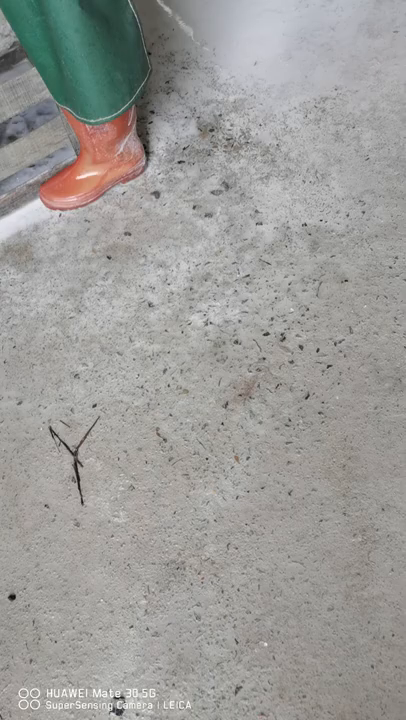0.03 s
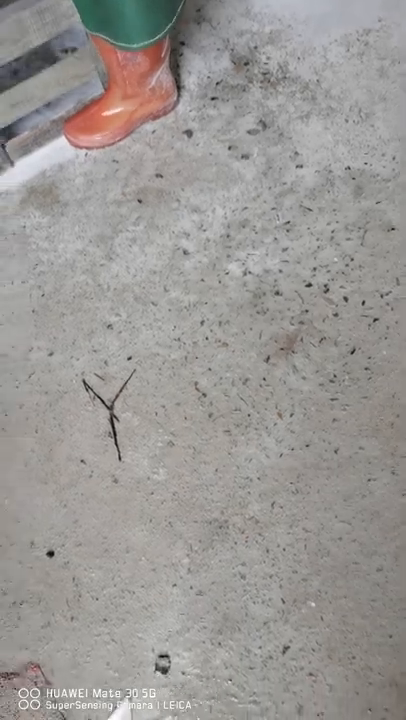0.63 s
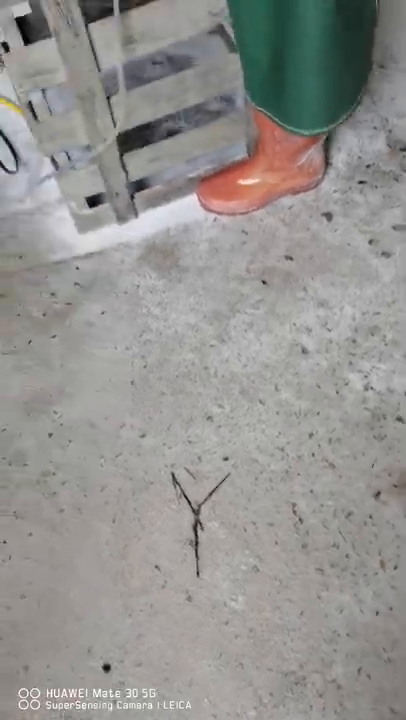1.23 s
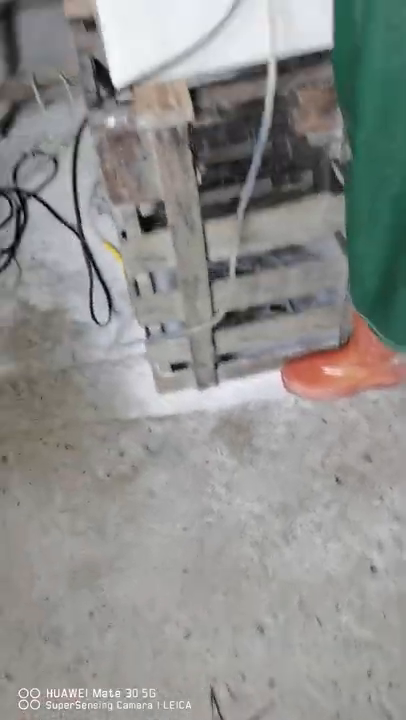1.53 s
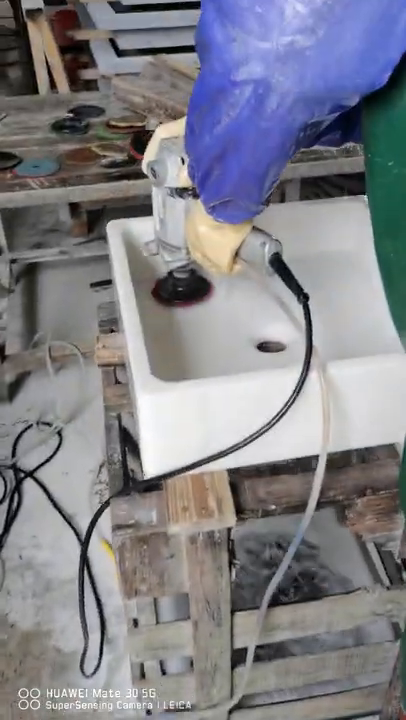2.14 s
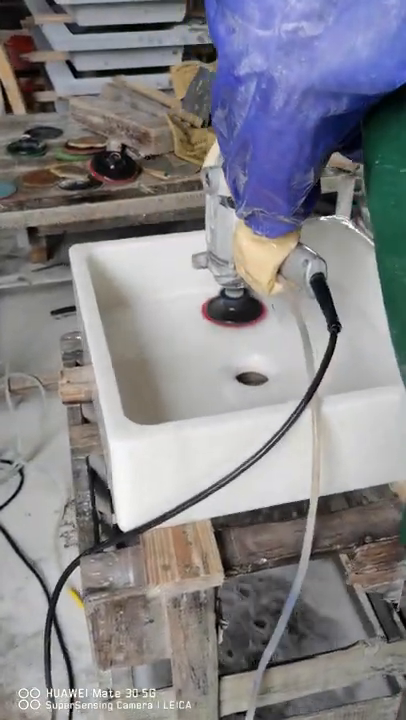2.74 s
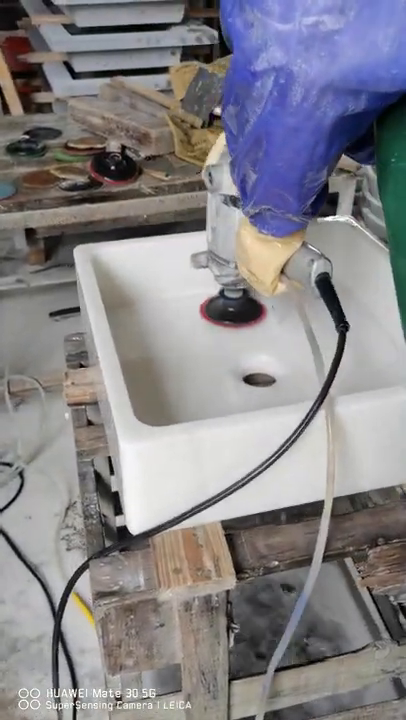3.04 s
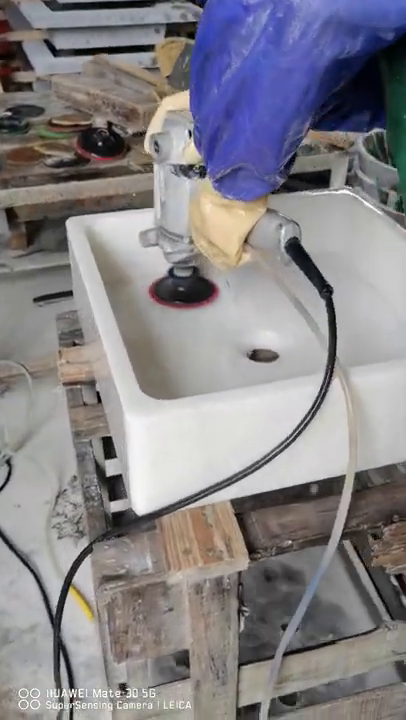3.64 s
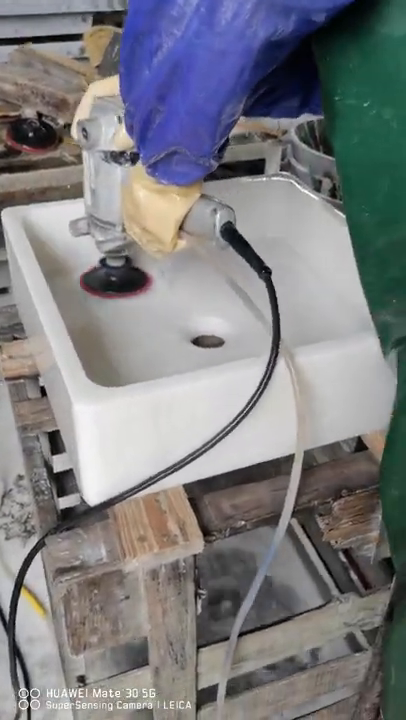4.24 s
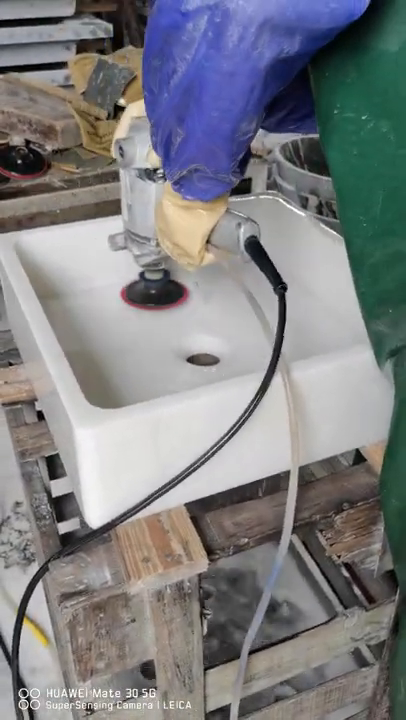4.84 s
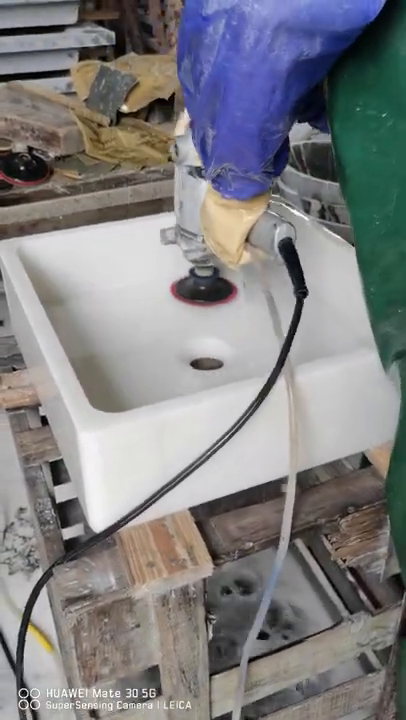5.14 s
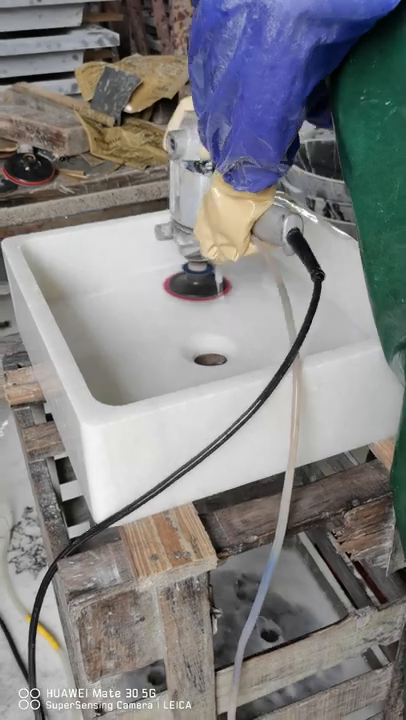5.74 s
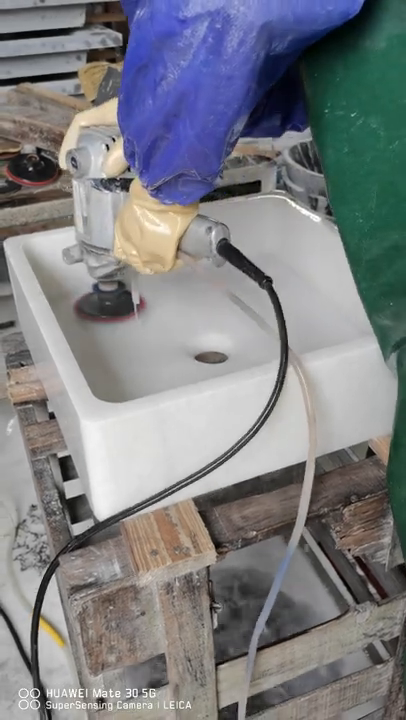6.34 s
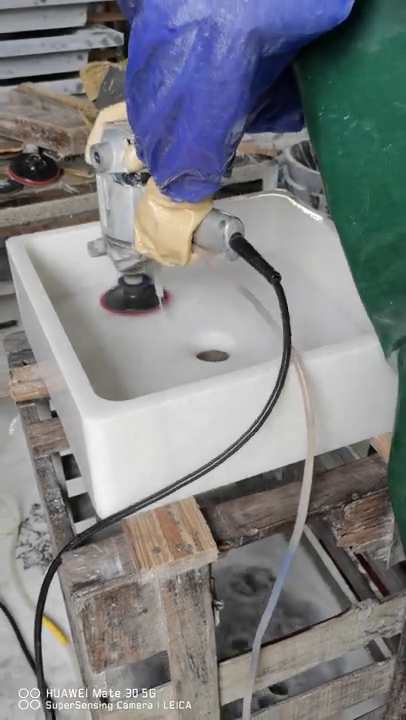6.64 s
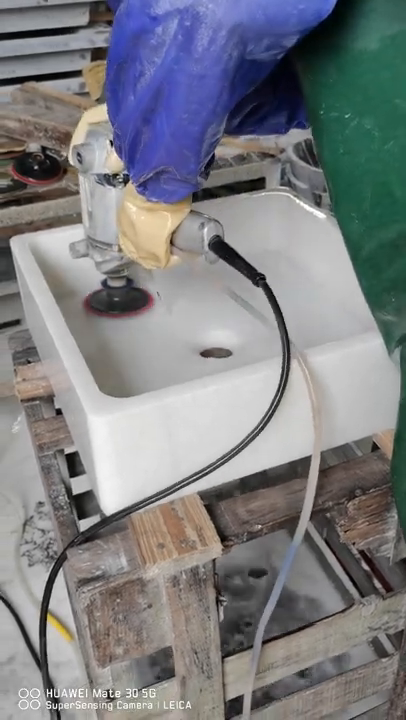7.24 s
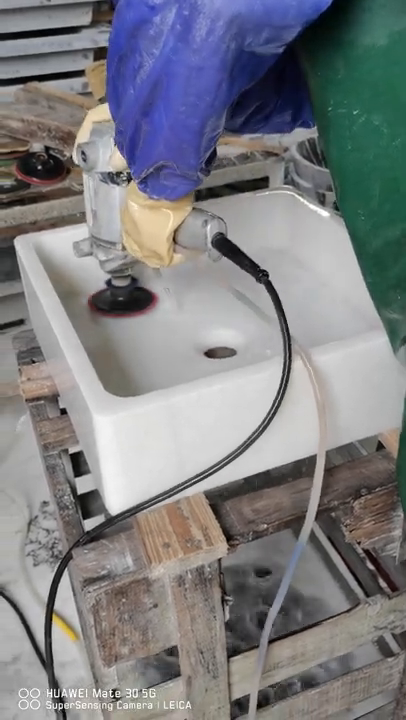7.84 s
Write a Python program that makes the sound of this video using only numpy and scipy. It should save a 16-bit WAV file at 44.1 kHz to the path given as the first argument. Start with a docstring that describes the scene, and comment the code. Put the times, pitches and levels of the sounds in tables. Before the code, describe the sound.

A power polisher runs loudly against a wet stone basin in a workshop, starting suddenly and never pausing. The pad makes a steady roar with gritty grinding and a wavering hiss, which brightens as the microphone turns toward it in the first two seconds. The motor's high whine swells briefly several times and shifts slightly in pitch under load, while the basin rings faintly and other machines hum beneath.

```python
"""Polishing a wet stone basin

In a workshop, a handheld electric polisher works the basin's wet floor while a stereo microphone swings
up from the ground to face it. The spinning pad roars, grinds and hisses on the stone and rings the basin;
the motor whines and sags a little under load. Beneath lies the steady hum of that motor and other
machines. The sound cuts in after a moment of silence."""
import sys
import numpy as np
from scipy import signal
from scipy.fft import rfft, irfft
from scipy.io import wavfile
from scipy.ndimage import uniform_filter1d

SR = 44100
rng = np.random.default_rng(int(sys.argv[2]) if len(sys.argv) > 2 else 0)


def unload_audio(sound):
    """Save the sound as a 16-bit wav file, at the path given as the first command line argument."""
    columns = np.transpose(np.atleast_2d(sound))
    # keep every value between -1 and 1, then stretch to whole-number steps
    steps = np.round(np.clip(columns, -1, 1) * 32767)
    wavfile.write(sys.argv[1], SR, steps.astype(np.int16))


N = 347508
T = np.arange(N) / SR
FRAME_S = np.arange(N // 512 + 5)[:, None] * 512 / SR
BIN_HZ = np.fft.rfftfreq(2048, 1 / SR)


# the pad bites harder into the stone: centre_s, half_length_s, gain_db
PAD_BITES = [(1.58, 0.32, 0.9), (5.9, 1, 0.54)]
def pad(spindle, throb=.035, chatter_db=.52, grit_db=.54):
    """The pad presses harder once a turn and chatters in the hand; grit makes the treble uneven."""
    pressure = gain_of(chatter_db * drift(18.5)) * (1 + throb * np.cos(spindle))
    grit = grit_db * drift(700)
    bite = swells(PAD_BITES)
    return pressure * (wet_hiss(grit) + roar(bite) + grinding(bite + grit))


# colour of the roar, microphone pointing down and facing the basin: frequency_hz, relative_db
ROAR_DOWN = [(15, -54), (25, -19), (103, -12.5), (168, -14), (200, -7), (301, -3), (331, -3), (764, -8),
             (965, -5), (1220, -14.5), (1480, -6.5), (2600, -6), (3380, -23), (5720, -120)]
ROAR_FACING = [(15, -53), (25, -23), (123, -13), (178, -14.5), (204, -4.5), (238, -10.5), (319, -5),
               (403, -8), (560, -4.5), (779, -3.5), (1000, -2.5), (1200, 0.5), (1400, -9), (2180, -5.5),
               (2600, -4.5), (3380, -6), (5720, -120)]
def roar(boost_db):
    """The low band of the pad rubbing on stone."""
    return friction(ROAR_DOWN, ROAR_FACING, patchy_db=.82) * gain_of(aimed(-24.5, -26.5) + boost_db)


# colour of the grinding, microphone down and facing: frequency_hz, relative_db
GRIND_DOWN = [(1290, -27), (2200, -4.5), (2510, -8), (2880, 0), (5000, -4.5), (5490, -8), (6470, -7.5),
              (7220, -7), (8200, -6.5), (10700, -25), (18000, -120)]
GRIND_FACING = [(1290, -25), (2200, -20.5), (2610, -1), (2960, -1.5), (3510, 0), (5730, -5.5), (6400, -4.5),
                (6690, -2), (8200, -4), (10700, -44), (18000, -120)]
def grinding(boost_db):
    """The middle band of the rubbing."""
    return friction(GRIND_DOWN, GRIND_FACING, patchy_db=1.4) * gain_of(aimed(-20.5, -23) + boost_db)


# colour of the hiss, microphone down and facing: frequency_hz, relative_db
HISS_DOWN = [(6000, -42), (7800, -8.5), (9500, 0.5), (12700, -8.5), (16000, -12)]
HISS_FACING = [(6500, -42), (8200, -11.5), (9400, -1), (11200, -5), (14000, -4.5), (16000, -12.5)]
# the hiss slackens between strokes: centre_s, half_length_s, gain_db
HISS_LULLS = [(3.5, 0.17, -0.5), (4.32, 0.082, -2.5), (5.5, 0.28, -2), (6.3, 0.26, -0.7), (7.13, 0.061, -4),
              (7.45, 0.14, -0.5)]
def wet_hiss(boost_db, wet_db=.84):
    """The top band of the rubbing wavers with the water film and opens up as the microphone rises."""
    film_db = swells(HISS_LULLS) + wet_db * drift(3.1)
    level_db = aimed(-21, -18, full_aim=.74) + film_db + boost_db
    return friction(HISS_DOWN, HISS_FACING, patchy_db=1.5) * gain_of(level_db)


# resonances of room, basin and tool housing: pitch_hz, width_hz, gain_db
RESONANCES = [(142, 19, 4), (215, 16, 3), (279, 15, 2), (554, 34, 4.5), (800, 50, 3.5), (985, 41, 1.5),
              (1014, 63, -4.5), (1170, 250, 0.5), (2850, 106, 3.5), (3480, 58, 4)]
# resonances picked up over only part of the microphone's swing: aim, pitch_hz, width_hz, gain_db
SWING_RESONANCES = [(.13, 326, 62, 2), (.13, 840, 57, 0), (.22, 2800, 54, 3), (.4, 143, 18, 11),
                    (.45, 7600, 530, 5), (.5, 6370, 220, 7), (.6, 870, 110, 4)]
# the pad squeals or the basin rings briefly:
# centre_s, half_length_s, pitch_hz, glide_hz_per_s, width_hz, gain_db
SQUEALS_AND_RINGS = [(1.595, .22, 4000, 1900, 480, 10), (2.85, .6, 13100, 400, 900, 4.5),
                     (4.552, 0.26, 3600, 0, 400, 2.5), (5.35, .4, 766, 0, 60, 5),
                     (5.4, .3, 4120, 100, 220, 6)]
def ringing(aim, aim_spread=.16):
    """The dB that resonances, squeals and brief rings add to the rubbing, by frame and frequency."""
    colour = sum(db / (1 + (2 * (BIN_HZ - hz) / width) ** 2) for hz, width, db in RESONANCES)
    for spot, hz, width, db in SWING_RESONANCES:
        colour = colour + db * bump(aim - spot, aim_spread) * bump(BIN_HZ - hz, width)
    for centre, half, hz, glide, width, db in SQUEALS_AND_RINGS:
        age = FRAME_S - centre
        colour = colour + db * bump(age, half) * bump(BIN_HZ - hz - glide * age, width)
    return colour


def friction(down, facing, patchy_db):
    """Steady rubbing noise; the contact patch keeps changing, so narrow bands come and go."""
    aim = aim_at(FRAME_S)
    colour_db = (1 - aim) * spectrum_at(down, BIN_HZ) + aim * spectrum_at(facing, BIN_HZ) + ringing(aim)
    patches = uniform_filter1d(rng.standard_normal(colour_db.shape), size=14, axis=0)
    patches = unit_rms(uniform_filter1d(patches, size=12, axis=1))
    return stereo_noise(gain_of(colour_db + patchy_db * patches), aim)


# the whine flares as the tool is tilted: centre_s, half_length_s, gain_db
WHINE_FLARES = [(1.65, 0.26, 5.5), (3.35, 0.3, 10), (3.75, .1, 14.5), (4.12, 0.088, 10), (4.7, .1, 8),
                (5.3, 0.064, 9), (5.92, .1, 6), (7.05, .08, 9), (7.62, 0.12, 13.5)]
# weaker motor tones: multiple_of_rotor_rate, level_db
ROTOR_TONES = [(1, -58.5), (2, -52), (4, -51), (9, -43), (10, -45), (11, -41), (12, -43.5), (14, -45)]
def motor(rotor, spindle, rotor_hz, whine_order=18, wobble=.55, waver_db=2):
    """Multiples of the rotor rate; the main whine wavers, flares and wobbles once a spindle turn."""
    whine = room_tone(whine_order * rotor, whine_order * rotor_hz, scatter=.53, fade_hz=10)
    whine *= gain_of(aimed(-32, -41) + swells(WHINE_FLARES) + waver_db * drift(4.6))
    whine *= 1 + wobble * np.cos(spindle)
    return whine + sum(gain_of(db) * room_tone(order * rotor, order * rotor_hz, scatter=1, fade_hz=2.8)
                       for order, db in ROTOR_TONES)


# the motor's speed eases up and down with the load: time_s, rotor_hz
ROTOR_SPEED = [(.3, 365.6), (1.3, 372.3), (2.3, 377.2), (2.9, 375), (3.7, 376.7), (4.0, 374.6),
               (4.65, 378.3), (5.25, 375.3), (5.9, 384.4), (6.45, 387.9), (7.0, 381.6), (7.8, 376.6)]
def polisher(gear_ratio=4.82, speed_jitter=.00022):
    """The rotor drives the pad through a reduction gear."""
    rotor_hz = curve(ROTOR_SPEED, T)
    rotor = angle_of(rotor_hz * (1 + speed_jitter * drift(9.4)))
    spindle = rotor / gear_ratio
    return pad(spindle) + motor(rotor, spindle, rotor_hz.mean())


# hum of the polisher's motor and other workshop machines: pitch_hz, mic_down_db, mic_facing_db, fade_hz
HUM_TONES = [(66, -51, -57.5, 3.6), (105.2, -39, -64, 3.6), (210.4, -40, -44.5, 5.6),
             (333, -37, -53.5, 4.8), (369.5, -32.5, -59, 3.5), (1500, -49, -56, 6.8),
             (1672, -38.5, -48, 0.94), (1846, -37, -49, 8.7)]
def steady_hum():
    """Steady motor and machine tones, blurred by the room and stronger with the microphone down."""
    return sum(gain_of(aimed(down, facing)) * room_tone(angle_of(hz), hz, scatter=.31, fade_hz=fade)
               for hz, down, facing, fade in HUM_TONES)


# the microphone's swing: time_s, aim (0 down at the ground, 1 facing the basin)
MIC_SWING = [(.3, 0.14), (1.0, 0.24), (1.7, 0.49), (2.0, 0.59), (2.3, 0.99), (7.88, 0.99)]
def aim_at(t):
    """Where the microphone points at the times t."""
    return curve(MIC_SWING, t)


def aimed(down_db, facing_db, full_aim=1):
    """A level that moves from down_db to facing_db as the microphone swings up to full_aim."""
    return down_db + (facing_db - down_db) * np.clip(aim_at(T) / full_aim, 0, 1)


# balance of the microphone's two ports: frequency_hz, left_minus_right_db
PORT_BALANCE = [(100, 0), (1150, 1), (1300, 1.5), (1500, 0), (2200, 1.5), (3600, -2), (5200, 1), (5600, 6),
                (6800, 4.5), (8900, 11), (9750, 1.5), (10300, -6), (14000, -5.5), (15500, 3)]
def port_gains(hz):
    """Left and right gains at a frequency, with a mean power of 1."""
    tilt = gain_of(spectrum_at(PORT_BALANCE, hz) / 2)
    pair = np.array([tilt, 1 / tilt])
    return pair / np.sqrt(np.mean(pair ** 2, axis=0))


# how alike the two ports hear the room: frequency_hz, coherence
PORT_COHERENCE = [(40, 0.34), (100, 0.94), (180, 1), (400, 0.83), (1250, 0.62), (1700, 0.04), (3800, 0.18),
                  (6000, 0.099), (15000, 0.1)]
def stereo_noise(colour, aim, lead_down_ms=.42, lead_facing_ms=.13):
    """Coloured noise at both ports; the left one's lead shrinks as the microphone turns to the tool."""
    lead_ms = (1 - aim) * lead_down_ms + aim * lead_facing_ms
    delay = np.exp(-2j * np.pi * BIN_HZ * lead_ms / 1000)
    coherence = spectrum_at(PORT_COHERENCE, BIN_HZ)
    left, right = port_gains(BIN_HZ)
    size = colour / np.linalg.norm(colour, axis=1, keepdims=True)
    size /= np.sqrt(1 + left * right * coherence * delay.real)  # the colour holds for the ports' sum
    shared, apart = rng.standard_normal((2, *size.shape)) + 1j * rng.standard_normal((2, *size.shape))
    spectra = size * np.array([left * shared, right * delay * blend(shared, apart, coherence)])
    pair = signal.istft(spectra.transpose(0, 2, 1), nperseg=2048, noverlap=1536)[1][:, :N]
    return pair / pair.mean(0).std()


def room_tone(angle, hz, scatter, fade_hz):
    """A tone at both ports: a direct part plus reflections that fade in and out."""
    shared, apart = (drift(fade_hz) + 1j * drift(fade_hz) for _ in range(2))
    coherence = spectrum_at(PORT_COHERENCE, hz)
    paths = 1 + scatter * np.array([shared, blend(shared, apart, coherence)])
    rms = np.sqrt((1 + (1 + coherence) * scatter ** 2) / 2)
    return port_gains(hz)[:, None] * (paths * np.exp(1j * angle)).real / rms


def blend(shared, apart, coherence):
    """An equal-power mix of two noises."""
    return coherence * shared + np.sqrt(1 - coherence ** 2) * apart


def gain_of(db):
    """Decibels to a factor."""
    return 10 ** (db / 20)


def unit_rms(x):
    """Scaled to rms 1."""
    return x / np.sqrt(np.mean(x ** 2) + 1e-20)


def curve(rows, t):
    """A time table's value at the times t."""
    return np.interp(t, *np.transpose(rows))


def spectrum_at(points, hz):
    """A spectrum table's value, interpolated along log frequency."""
    points_hz, values = np.transpose(points)
    return np.interp(np.log(hz + 1), np.log(points_hz + 1), values)


def drift(rate_hz):
    """Random motion of rms about 1, mostly slower than rate_hz."""
    t = T[::16]
    hz = np.fft.rfftfreq(len(t), t[1])
    spectrum = rfft(rng.standard_normal(len(t))) / (1 + (hz / rate_hz) ** 4)
    return np.interp(T, t, unit_rms(irfft(spectrum, len(t))))


def angle_of(hz):
    """Angle of something that turns at this rate."""
    return 2 * np.pi * np.cumsum(hz * np.ones(N)) / SR


def bump(offset, half):
    """A smooth rise and fall of height 1."""
    return np.exp(-np.minimum((offset / half) ** 2, 20))


def swells(rows):
    """Level in dB of smooth swells or dips."""
    return sum(db * bump(T - centre, half) for centre, half, db in rows)


def scene():
    """The polisher in the basin, over the hum of its motor and other machines."""
    return polisher() + steady_hum()


def record(dry, start_s=.3115, edge_hz=15780):
    """The microphone opens abruptly and passes nothing above its band limit."""
    opened = dry * np.clip((T - start_s) / .001, 0, 1)
    lowpass = signal.firwin(1023, edge_hz, window=("kaiser", 9), fs=SR)
    return signal.oaconvolve(opened, lowpass[None], "same")


dry = scene()
out = record(dry)
unload_audio(out)
```